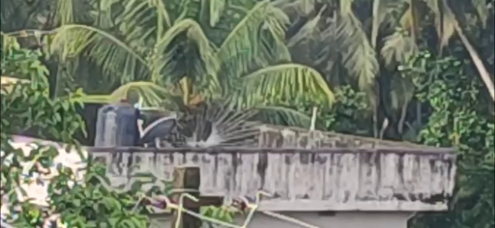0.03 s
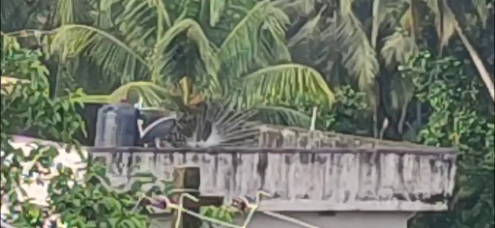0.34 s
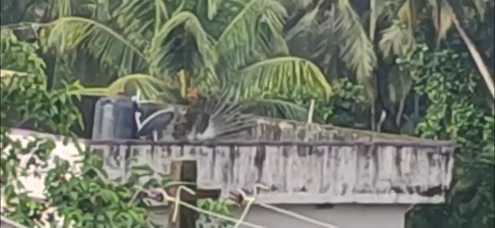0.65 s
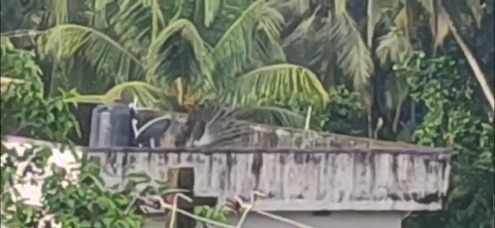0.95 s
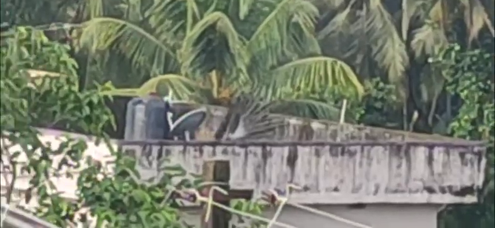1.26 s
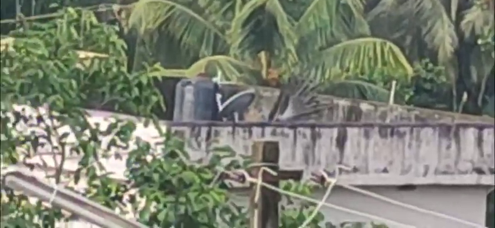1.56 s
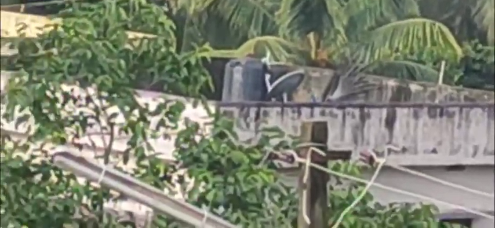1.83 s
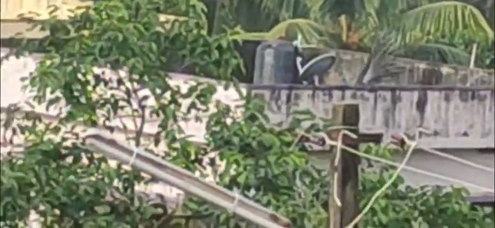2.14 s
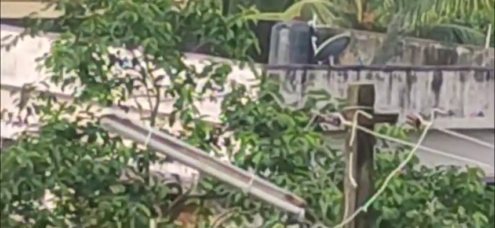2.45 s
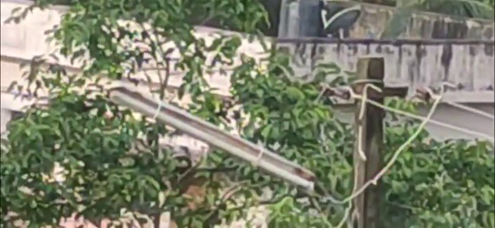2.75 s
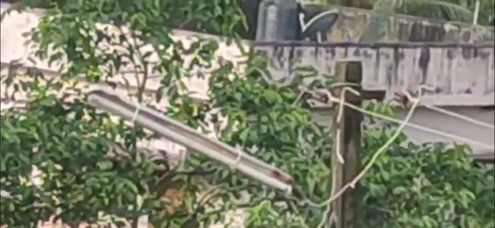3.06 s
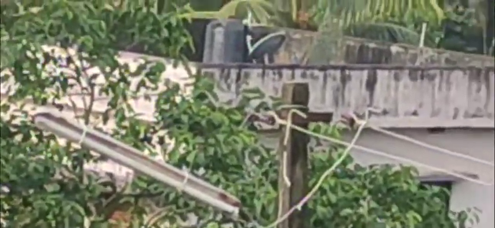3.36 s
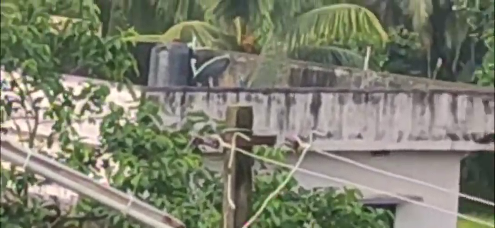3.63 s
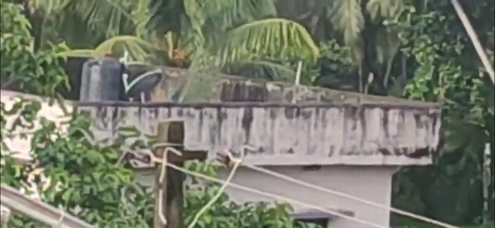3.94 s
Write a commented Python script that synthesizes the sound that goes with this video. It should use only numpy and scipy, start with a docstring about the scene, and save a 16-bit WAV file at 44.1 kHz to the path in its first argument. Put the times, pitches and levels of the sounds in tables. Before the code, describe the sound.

Birds call among trees and houses over a low town rumble. The microphone opens with a soft thump at 0.4 seconds, and a short hooked chirp repeats steadily, amid thin whistles. A wavering trill sinks from 1.3 to 1.9 seconds, then louder swooping whistles repeat until the end. A faint, far hoarse bird calls near 2.8, faint high insect tones enter at 3, and the trill restarts near 3.9.

```python
"""Among palms and flat-roofed houses, with unseen birds all round. One repeats a swooping whistle, another a
short hooked chirp, a third sings a wavering trill that sinks in pitch; thin whistles, chips, a far hoarse
call and faint insect tones lie behind them. Walls and trees scatter the calls over a low town rumble.
The microphone, mono, opens just after the start with a soft thump."""
import sys
import numpy as np
from scipy import signal
from scipy.fft import rfft, irfft
from scipy.io import wavfile
from scipy.ndimage import uniform_filter1d, map_coordinates

SR = 44100
rng = np.random.default_rng(int(sys.argv[2]) if len(sys.argv) > 2 else 0)


def file_out(sig):
    """Save sig as 16-bit WAV at sys.argv[1]."""
    # one column per channel
    cols = np.atleast_2d(sig).T
    # limit, then scale
    lim = np.clip(cols, -1, 1)
    pcm = np.round(lim * 32767).astype(np.int16)
    wavfile.write(sys.argv[1], SR, pcm)


N = 176400

# The town's rumble and its deep drone. Each row: frequency in Hz, spectral level in dB.
RUMBLE_SPECTRUM = [(20, -0.5), (35, -1.5), (60, -1), (80, -5), (100, -4), (125, -9), (160, -10.5),
                   (195, -14.5), (260, -14), (325, -14.5), (440, -19.5), (583, -28), (700, -30.5),
                   (1260, -36.5), (1700, -38), (2000, -36), (2600, -51.5)]
DRONE_SPECTRUM = [(35, -20.5), (50, -4), (60, 0.5), (68, -5), (80, -22)]
# A low hum that comes and goes. Each row: start and length in seconds, first and last Hz, level in dB.
TOWN_HUMS = [(2.04, 0.096, 316.5, 321, -57), (2.47, .14, 351, 345, -55), (3.3, 0.12, 331, 328, -61.5),
             (3.87, 0.11, 323, 309, -55.5)]
# The far chorus and the high hiss in the trees. Each row: frequency in Hz, spectral level in dB.
CHORUS_SPECTRUM = [(1800, -30.5), (2200, -9), (2700, -7), (3500, -5), (4600, 1), (5400, -7.5), (6500, -13),
                   (7600, -21), (8400, -38.5)]
HISS_SPECTRUM = [(4200, -15.5), (5200, -0.5), (6000, 1.5), (6700, -2), (7600, -8.5), (8400, -30)]
# Swells of that hiss. Each row: time in seconds, level in dB.
HISS_SWELLS = [(.41, -67), (.62, -62.5), (.75, -62), (.88, -69.5), (1.06, -72.5), (1.18, -63), (1.33, -69),
               (1.47, -62), (1.72, -71), (2.03, -65.5), (2.17, -75.5), (2.36, -58), (2.6, -74),
               (2.79, -63.5), (2.96, -69), (3.18, -57.5), (3.39, -71.5), (3.6, -64), (3.76, -64),
               (3.9, -57.5), (4, -58)]

# One call of each kind. Each row: seconds into the call, pitch in Hz, level in dB.
THIN_SHAPE = [(0, 5560, -7.5), (.04, 5535, -4), (.075, 5520, 0.5), (.12, 5470, -6), (.16, 5220, -11)]  # high, drooping at its end
HOOK_SHAPE = [(0, 4243, -9.5), (.008, 4643, 2.5), (.018, 4990, 5.5), (.023, 4905, -34), (.027, 3005, -24.5),
              (.034, 3533, -1.5), (.042, 4400, -27.5), (.055, 3850, -4), (.064, 3397, -3.5),
              (.083, 2784, -6), (.092, 2680, -7.5)]  # up-flick, lower flick, down-slur
SWOOP_SHAPE = [(0, 6765, -8.5), (.004, 5600, 0), (.009, 3600, -5), (.016, 2560, -5), (.03, 2330, -14.5),
               (.05, 2500, -11.5), (.08, 2660, -11), (.097, 2950, -6.5), (.107, 3380, 2.5),
               (.119, 3680, -7), (.131, 3860, -1), (.141, 4030, -2), (.149, 4200, -12.5),
               (.162, 4680, -3.5), (.174, 4800, -26)]  # steep dive, slower climb
# Their repeats. Each row: start in seconds, level in dB, length factor, pitch factor, opening stress in dB.
THIN_CALLS = [(.405, -49, 0.96, 1.003, 1.5), (3.53, -48.5, 1.05, .99, 1.5)]
HOOK_CALLS = [(.411, -48.5, 0.95, 0.96, -2), (.813, -49.5, 0.9, 0.99, -1), (1.226, -52, 1.04, 0.98, -3.5),
              (1.620, -53, .95, 0.99, 0), (2.024, -51.5, 1, 0.92, -0.5), (2.411, -53.5, 1, 0.98, 4),
              (2.817, -52, 1.05, 1, -1), (3.215, -53, 0.96, 0.97, 3.5), (3.632, -51, 0.97, 0.96, 0)]
SWOOP_CALLS = [(1.840, -48.5, 1.025, 1, -3.5), (2.276, -44, 1.03, 0.98, -2), (2.662, -43.5, 1.013, 1, 1),
               (3.044, -41, 0.98, 0.98, -7.5), (3.436, -42.5, 1.03, 0.99, -1.5),
               (3.842, -40.5, 0.98, 0.98, -6.5)]
# Plain gliding calls. Each row: start and length in seconds, first and last pitch in Hz, level in dB.
HIDDEN_CALLS = [(.50, .11, 5400, 4500, -53), (.47, .2, 4600, 3700, -57), (.52, 0.099, 2970, 2350, -61),
                (0.78, 0.042, 6840, 4700, -52), (1.88, 0.095, 2540, 2420, -56),
                (2.7, 0.019, 5900, 5600, -60), (1.8, 0.12, 6600, 6000, -60), (3.52, 0.041, 7300, 4800, -56),
                (3.58, 0.091, 4600, 4500, -52.5), (1.99, .12, 5400, 3700, -59)]
DRAWN_WHISTLES = [(1.06, .09, 3580, 3545, -53), (1.135, .125, 3530, 3440, -49),
                  (1.01, .06, 4200, 4150, -55), (.70, .06, 3600, 3500, -56), (2.585, .055, 3420, 3500, -52),
                  (2.71, .05, 3510, 3490, -54), (1.785, .04, 6950, 6650, -59), (1.86, .3, 4260, 4170, -58),
                  (1.895, .045, 2560, 2680, -52), (1.25, .09, 4900, 4880, -59), (.56, .22, 5570, 5560, -58)]
FALLING_CHIPS = [(.742, 0.013, 5700, 4160, -51), (.908, 0.023, 5920, 5150, -55.5),
                 (.955, 0.046, 5680, 4050, -51.5), (1.551, .014, 5570, 4074, -58.5),
                 (1.948, .014, 6100, 4480, -54), (2.088, .016, 6860, 4400, -51),
                 (2.108, 0.016, 5940, 4130, -48), (2.32, 0.043, 4570, 4230, -52.5),
                 (2.69, 0.021, 4620, 4140, -57), (3.553, .014, 5800, 4350, -50),
                 (3.902, 0.015, 5900, 4160, -54)]
# The arch of one trill note. Each row: share of its length, pitch factor, level in dB.
TRILL_SHAPE = [(0, .86, -20), (.17, .97, -6.5), (.3, 1.02, -6.5), (.55, 1, 1.5), (0.801, .98, -4),
               (1, .89, -8)]
# The trill. Each row: start and length in seconds, pitch in Hz, level in dB, fall as a share of the pitch.
TRILL_NOTES = [(1.254, .06, 3225, -43.5, .09), (1.338, .056, 3082, -41.5, 0.027),
               (1.421, .052, 2996, -43.5, .025), (1.497, 0.058, 2970, -44, .015),
               (1.576, 0.048, 2944, -41.5, .005), (1.654, .05, 2920, -44.5, 0.0055),
               (1.733, 0.04, 2850, -46, -.04), (1.808, 0.045, 2590, -49.5, 0.0074),
               (3.882, 0.056, 3230, -43.5, 0.091), (3.971, 0.048, 3055, -41, 0.03)]
# Throat resonances of the hoarse caller. Each row: frequency and width in Hz, level in dB.
THROAT_MODES = [(649, 40, -1), (848, 56, -7), (1175, 54, -5.5), (1405, 150, -8), (1607, 66, -7.5),
                (1790, 40, -14.5)]
# Its syllables. Each row: start and length in seconds, level in dB.
HOARSE_SYLLABLES = [(2.753, 0.033, -63.5), (2.788, 0.035, -56), (2.92, 0.11, -69), (3.6, 0.16, -74.5)]
# The insects. Each row: pitch in Hz, start in seconds, level in dB.
INSECT_TONES = [(5650, 3.04, -60.5), (5690, 3.3, -59.5)]

WAVER, FLUTTER_DB = 0.0054, 2  # unsteadiness of a bird's pitch (as a share) and level
YARD_T60_S, YARD_BUILD_S, WALL_DB, WALL_SPAN_S = 0.55, 0.016, -2, .09
OPEN_S, THUMP_DB, THUMP_PEAK_S = .411, -36.5, 0.086


def undb(db):
    """Decibels to gain."""
    return 10 ** (np.asarray(db) / 20)


def unit(x):
    """Scale to an rms of 1."""
    return x / np.sqrt(np.mean(x ** 2) + 1e-30)


def walk(rate, size=N):
    """Smooth random wandering with a spread near 1, at `rate` steps a second."""
    at = np.arange(size) * rate / SR
    return map_coordinates(rng.standard_normal(4096), [at], order=3, mode="wrap")


def coloured(points):
    """Noise with a spectrum of (Hz, dB) points, rolling off beyond both ends."""
    hz, db = np.array(points).T
    f = np.maximum(np.arange(N // 2 + 1) * SR / N, 1)
    beyond = np.maximum(f / hz[-1], 1) * np.maximum(hz[0] / f, 1)
    gain = undb(np.interp(np.log(f), np.log(hz), db)) / beyond ** 2
    return unit(irfft(rfft(rng.standard_normal(N)) * gain, N))


def add(out, start_s, x):
    """Mix a sound in at a time."""
    i = int(np.clip(start_s * SR, 0, N))
    out[i:i + len(x)] += x[:N - i]


def echoes(x):
    """Early echoes off the house walls and a diffuse tail from the trees."""
    t = np.arange(SR) / SR
    build = 1 - np.exp(-t / YARD_BUILD_S)
    tail = unit(rng.standard_normal(SR) * build * np.exp(-np.log(1000) * t / YARD_T60_S))
    walls = np.zeros(SR)
    lag, strength = rng.random(size=(2, 24))
    walls[((.008 + lag * WALL_SPAN_S) * SR).astype(int)] = strength
    response = unit(tail + undb(WALL_DB) * unit(walls)) / np.sqrt(SR)
    return signal.fftconvolve(x, response)[:N]


def outdoors(x, wet_db):
    """The direct path to the microphone plus its echoes."""
    return x + undb(wet_db) * echoes(x)


def note(shape, waver=WAVER):
    """A bird's near-sine voice gliding through (s, Hz, dB) points, slightly unsteady."""
    s, hz, db = np.array(shape, float).T
    t = np.arange(int(s.max() * SR)) / SR
    glide = uniform_filter1d(np.interp(t, s, hz), size=130, mode="nearest")
    pitch = glide * (1 + waver * walk(250, size=len(t)))
    edges = np.clip(np.minimum(t, t[-1] - t) / 0.0015, 0, 1)
    level = undb(np.interp(t, s, db) + FLUTTER_DB * walk(118.6, size=len(t)))
    return edges * level * np.sin(2 * np.pi * np.cumsum(pitch) / SR)


def slurs(rows, edge_db, waver=WAVER):
    """Plain glides; edge_db is the level at both ends against the middle."""
    out, share = np.zeros(N), np.linspace(0, 1, num=9)
    for start, length, from_hz, to_hz, db in rows:
        hz = from_hz * (to_hz / from_hz) ** (share * (1.5 - .5 * share))
        level_db = db + edge_db * (2 * share - 1) ** 2
        add(out, start, note(np.c_[share * length, hz, level_db], waver))
    return out


def town():
    """The town's wandering rumble, deep drone and brief hums."""
    rumble = undb(-52.5 + 1.1 * walk(3.918)) * coloured(RUMBLE_SPECTRUM)
    drone = undb(-59.5) * coloured(DRONE_SPECTRUM)
    return rumble + drone + slurs(TOWN_HUMS, edge_db=-19)


def far_birds(per_s=18, low_hz=3400, high_hz=5600, length_s=0.058, fall=0.65, rise_db_per_s=1.35):
    """Falling chirps from far trees, all echo, over a slowly rising chorus and a swelling high hiss."""
    t = np.arange(N) / SR
    when, high, soft = rng.random((200, 3))[:int(per_s * N / SR)].T
    hz = low_hz + high * (high_hz - low_hz)
    rows = zip(when * N / SR, np.full(len(hz), length_s), hz, hz * fall, -64 - 8 * soft)
    chirps = slurs(rows, edge_db=-10)
    chorus = undb(-59 + rise_db_per_s * (t - 3.5) + walk(7.4)) * coloured(CHORUS_SPECTRUM)
    hiss_gain = undb(np.interp(t, *np.array(HISS_SWELLS).T))
    return echoes(chirps) + chorus + hiss_gain * coloured(HISS_SPECTRUM)


def repeating_bird(shape, calls, waver=WAVER):
    """One call sung again and again, each time a little changed; the stress fades over the call."""
    out = np.zeros(N)
    s, hz, shape_db = np.array(shape).T
    for start, db, length, pitch, stress_db in calls:
        level_db = db + shape_db + stress_db * (1 - s / s[-1])
        add(out, start, note(np.c_[s * length, hz * pitch, level_db], waver))
    return out


def hidden_birds():
    """Falling calls from behind the houses; only their blurred echo reaches the microphone."""
    return echoes(slurs(HIDDEN_CALLS, edge_db=0.5, waver=.04))


def trill():
    """Arched notes in a quick run, each a little lower."""
    out = np.zeros(N)
    share, arch, shape_db = np.array(TRILL_SHAPE).T
    for start, length, hz, db, fall in TRILL_NOTES:
        pitch = hz * arch * (1 + fall * (.5 - share))
        add(out, start, note(np.c_[share * length, pitch, db + shape_db]))
    return out


def hoarse_call():
    """Rough bursts through narrow throat resonances, far away."""
    f, t = np.maximum(np.arange(N // 2 + 1) * SR / N, 1), np.arange(N) / SR
    throat = sum(undb(db) / (1 + (2 * (f - hz) / width) ** 2) for hz, width, db in THROAT_MODES)
    effort = sum(undb(db) * np.sqrt(np.abs(np.sin(np.pi * np.clip((t - start) / length, 0, 1))))
                 for start, length, db in HOARSE_SYLLABLES)
    return effort * unit(irfft(rfft(rng.standard_normal(N)) * throat, N))


def insects(drift=0.0015, roughness=.003, flicker_db=0):
    """Two faint high tones, close and unsteady in pitch, beating against each other."""
    t, out = np.arange(N) / SR, np.zeros(N)
    for hz, start, db in INSECT_TONES:
        pitch = hz * (1 + drift * walk(5.3) + roughness * walk(300))
        onset = np.clip((t - start) / 0.012, 0, 1)
        out += onset * undb(db + flicker_db * walk(14)) * np.sin(2 * np.pi * np.cumsum(pitch) / SR)
    return out


def scene():
    """Birds, town and insects from one spot among the houses, the same in both channels."""
    birds = (outdoors(repeating_bird(SWOOP_SHAPE, SWOOP_CALLS), wet_db=-2)
             + outdoors(repeating_bird(HOOK_SHAPE, HOOK_CALLS), wet_db=0.5)
             + outdoors(trill(), wet_db=-5)
             + outdoors(repeating_bird(THIN_SHAPE, THIN_CALLS, waver=.007), wet_db=0.5)
             + outdoors(slurs(FALLING_CHIPS, edge_db=-7.5), wet_db=-1)
             + outdoors(slurs(DRAWN_WHISTLES, edge_db=-9.5), wet_db=-9))
    distance = hidden_birds() + outdoors(hoarse_call(), wet_db=-2.5) + far_birds() + town()
    return np.tile(birds + distance + outdoors(insects(), wet_db=-6), (2, 1))


def record(dry):
    """The microphone opens, its offset settles in a slow, soft thump, and the top is cut at 8100 Hz."""
    since = np.maximum(np.arange(N) / SR - OPEN_S, 0)
    thump = undb(THUMP_DB) * (since / THUMP_PEAK_S) ** 2 * np.exp(2 - 2 * since / THUMP_PEAK_S)
    live = dry * np.clip(since / 0.00066, 0, 1) + thump
    return signal.sosfilt(signal.ellip(8, .2, 70, 8100, fs=SR, output="sos"), live)


dry = scene()
out = record(dry)
file_out(out)
```